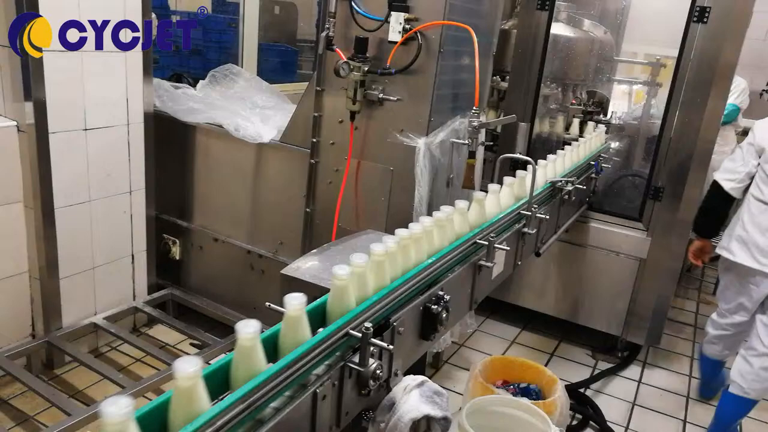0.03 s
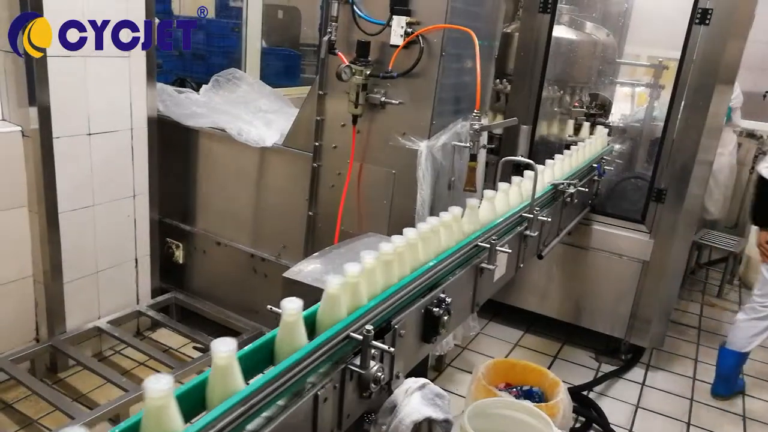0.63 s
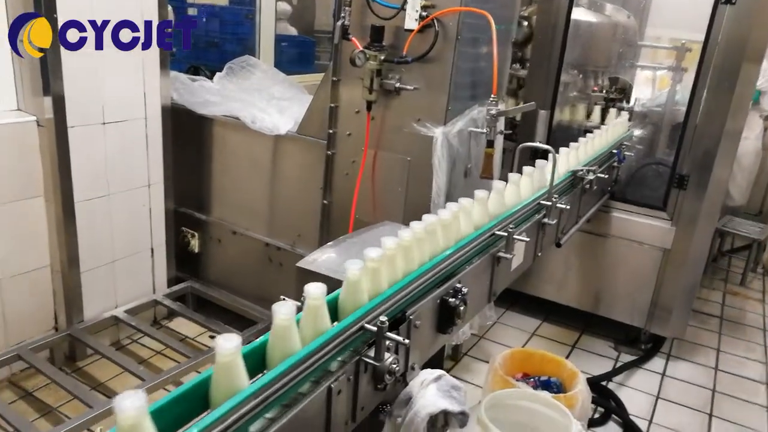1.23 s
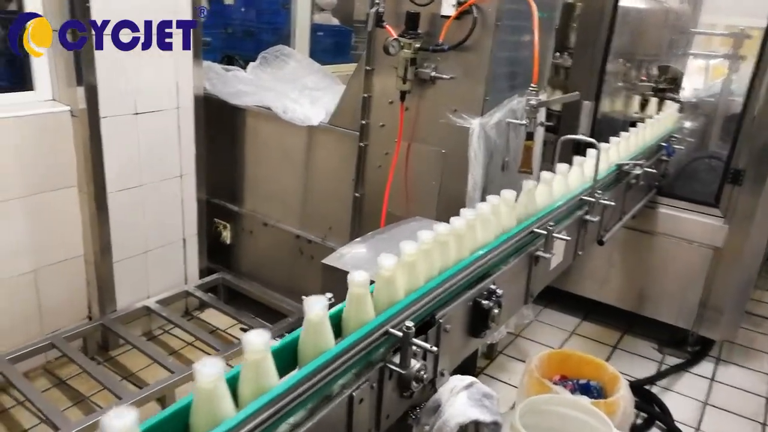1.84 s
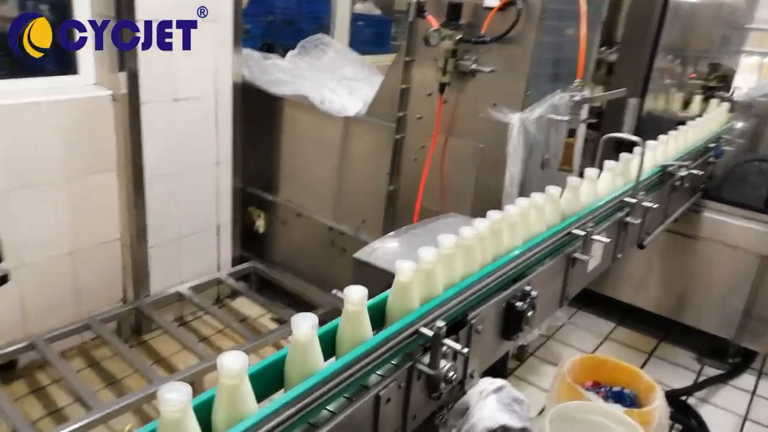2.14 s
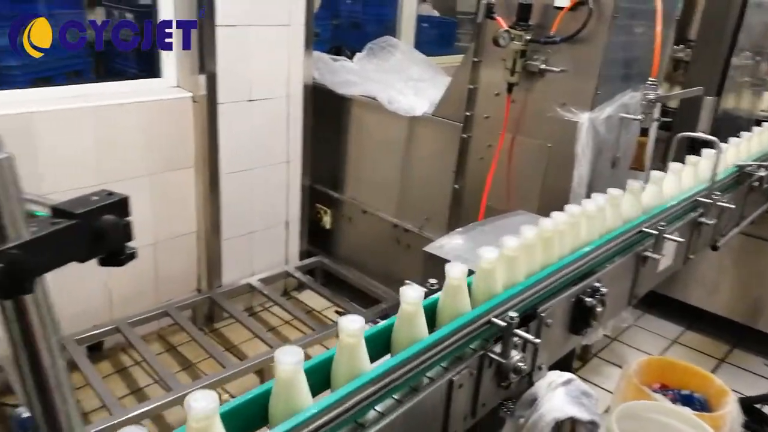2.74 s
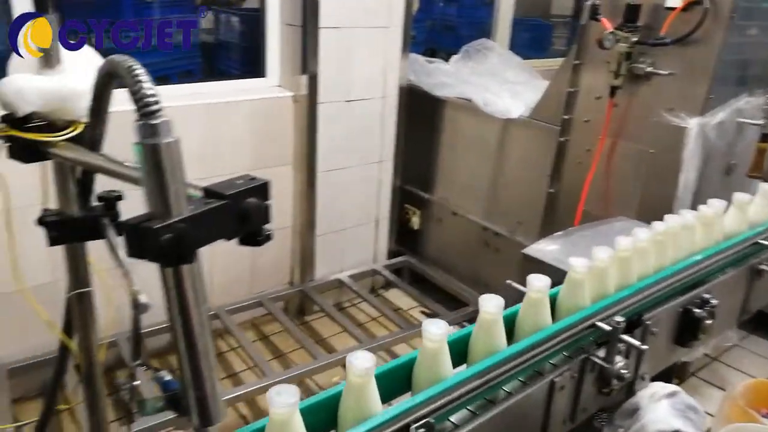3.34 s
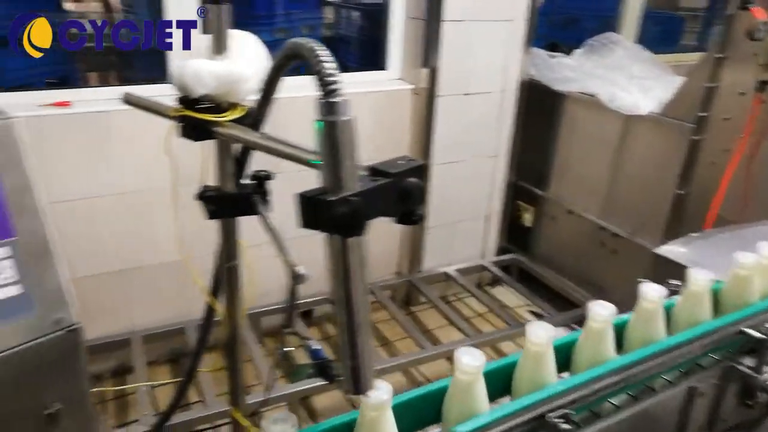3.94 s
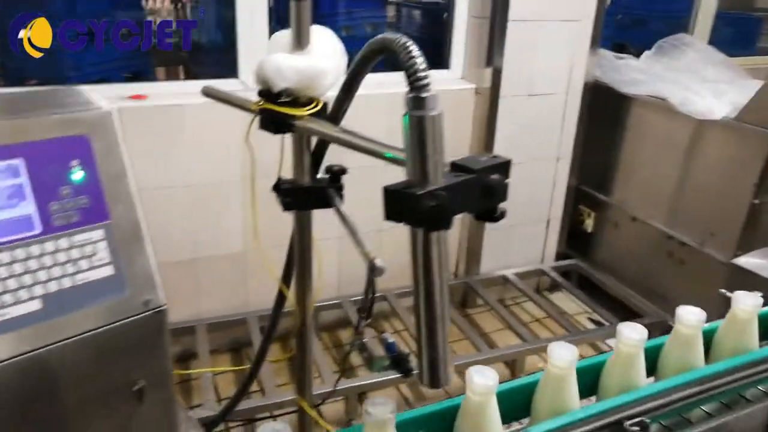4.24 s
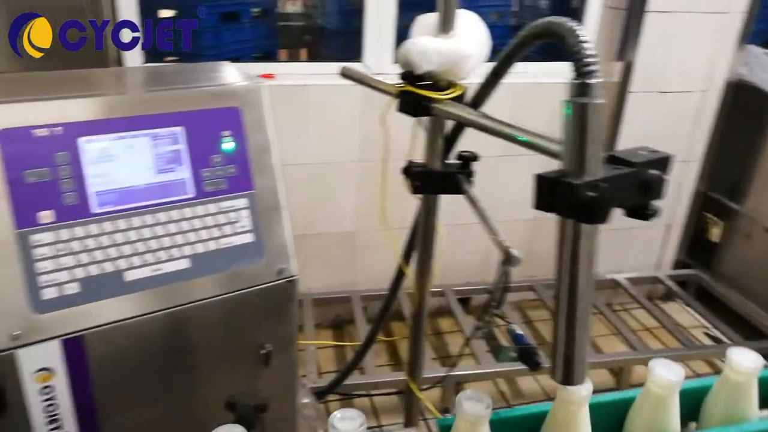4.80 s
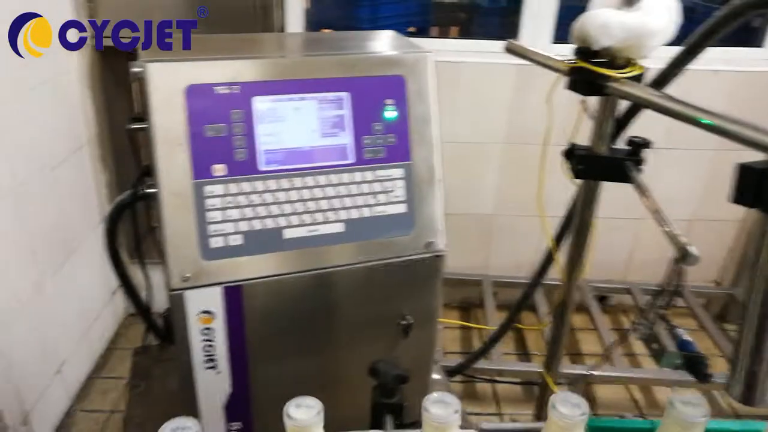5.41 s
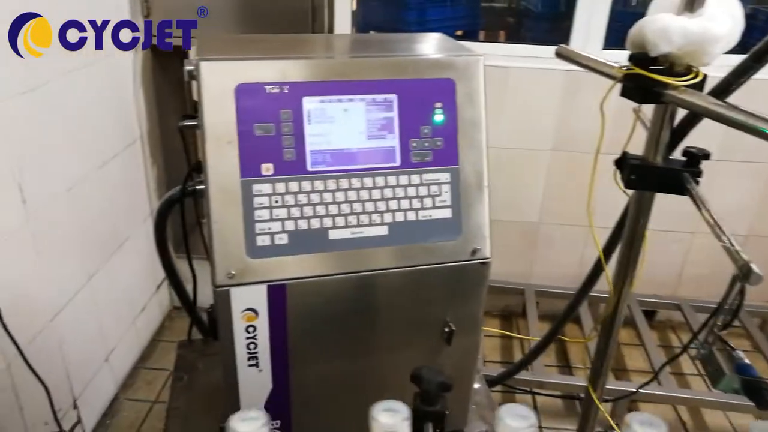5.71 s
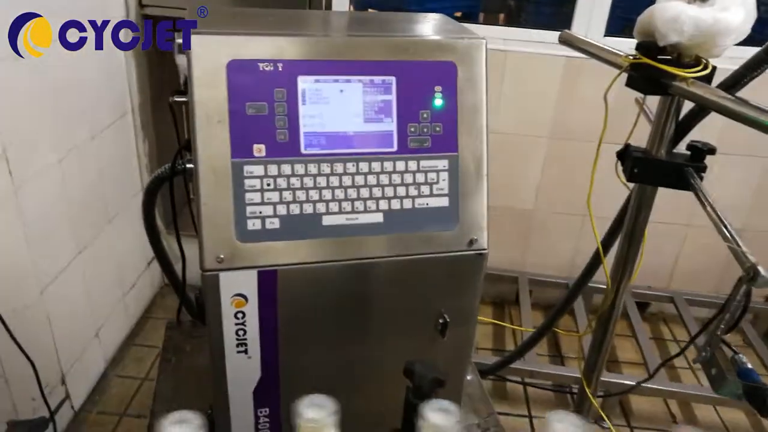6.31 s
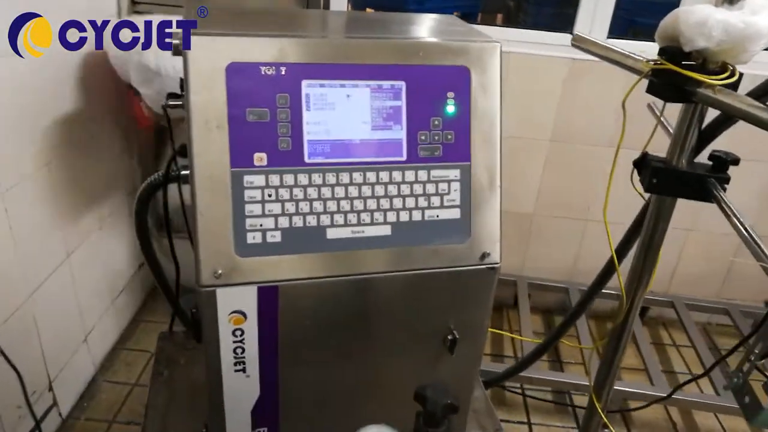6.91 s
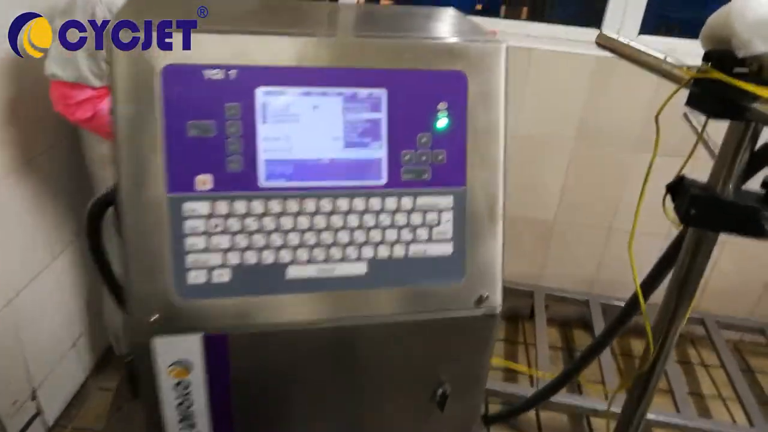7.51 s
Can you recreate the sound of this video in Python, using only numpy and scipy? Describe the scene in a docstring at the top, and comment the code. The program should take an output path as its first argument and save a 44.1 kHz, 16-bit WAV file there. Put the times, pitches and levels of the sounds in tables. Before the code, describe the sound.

After a brief silence, a bottling line starts abruptly at 0.3 seconds and runs throughout in a tiled factory room. Loud, bright compressed air hisses with slight spurts, strongest around 4.9 and 5.7 seconds. Beneath it a filling machine roars unevenly and motors rumble low. Conveyor chain links and bottles scrape and rattle on the left, with sharper bottle knocks near 1.1, 1.9 and 3.1 seconds, each with a short, bright echo. A guide rail squeals faintly around 1.4 seconds. At 3.8 seconds something heavy lands with a dull thud, booms in the room for about a second and rebounds softly at 4.2. As the microphone slowly turns away, the hiss softens slightly, the roar leans further left and the rattle grows a little. The rail gives three brief squeals between 7.2 and 7.5 seconds while the machinery keeps running.

```python
"""A bottling line in a tiled factory room; the listener slowly turns away from the filler.
After 0.3 s of silence: compressed air hisses in spurts, the filler roars, chain links and bottles
rattle and knock, drives rumble below. A guide rail squeals faintly at 1.35 s.
At 3.8 s something heavy thuds, booms in the room and rebounds softly.
From 7.2 s the rail squeals three more times."""
import sys
import numpy as np
from scipy import signal
from scipy.fft import rfft, irfft, next_fast_len
from scipy.io import wavfile
from scipy.ndimage import uniform_filter1d, map_coordinates

SR = 44100
rng = np.random.default_rng(int(sys.argv[2]) if len(sys.argv) > 2 else 0)


def transcribe(u):
    """Save the signal u as a 16-bit wav file named by the first command-line argument.

    u: samples, shape (n,) or (channels, n), limited to [-1, 1]; the rate is SR.
    q: integer samples, one column per channel.
    """
    v = np.clip(np.atleast_2d(u).T, -1, 1)
    q = np.round(v * 32767).astype(np.int16)
    wavfile.write(sys.argv[1], SR, q)


N = 332955
TIME = np.arange(N) / SR
START_S, TOP_HZ = 0.299, 15950

# listener's turn: t/s, heading (0 = facing the filler, 1 = turned away)
HEADING = [(0.3, 0), (2, 0.2), (3.4, .35), (4.2, 1), (5.5, 0.81), (7.55, 0.92)]


def air_jet():
    """Blow-off nozzles hiss; pressure sags after each spurt; level and colour follow the turn."""
    # jet spectra, facing and turned away: f/Hz, relative level/dB
    facing_spectrum = [(100, -90), (1500, -33), (3500, -5), (5300, -5), (7800, -2.5), (10000, -2.5),
                       (11000, -1), (11800, 2.5), (12900, -0.3), (14300, -4.5), (15900, -13)]
    turned_spectrum = [(100, -90), (1500, -32), (3500, -10), (5300, -6.5), (6900, -3), (10000, -3.5),
                       (11500, -0.8), (12700, 1), (13400, 0.2), (14500, -6), (15900, -9.5)]
    # stronger spurts: t/s, rise/dB
    spurts = [(.51, 0.5), (1.0, .8), (2.02, 1.5), (3.42, 1), (4.87, 3.5), (5.65, 2.8), (6.5, 2),
              (6.85, 1.2)]
    # jet direction: t/s, left-right/dB
    aim = [(.3, 1), (1, 1), (3.3, 1.5), (3.6, 2), (4.55, 3), (4.75, 1), (5.15, 0.5), (5.27, 2.5),
           (6.6, 2.3), (7.55, 2)]
    # added balance by frequency: f/Hz, left-right/dB
    balance = [(5000, 0.5), (8000, 0.5), (10000, 1.5), (12000, -3), (13500, -2), (15500, 2)]
    heading = curve(HEADING)
    spurt_db = swells(spurts, half_s=0.062)
    sag_db = 0.4 * swells(spurts, half_s=0.062, delay_s=0.16)
    level_db = -18.5 - 2.5 * heading + spurt_db - sag_db + 0.21 * wobble(10) + 0.47 * wobble(30)
    facing = at_ports(turbulence(patchy_db=1.06), facing_spectrum)
    turned = at_ports(turbulence(patchy_db=1.24), turned_spectrum)
    turn_rad = heading * np.pi / 2
    hiss = np.cos(turn_rad) * facing + np.sin(turn_rad) * turned
    return pan_bands(hiss, balance) * amp(level_db) * pan(curve(aim))


def filler():
    """The filler roars unevenly and leans further left as the listener turns."""
    # roar envelope: t/s, level/dB
    envelope = [(.3, -27), (.55, -24.5), (.95, -24), (1.39, -23.5), (1.7, -24.5), (2.5, -24), (3.6, -25.5),
                (4.5, -26), (4.78, -24.5), (5.02, -26.5), (5.6, -25), (5.75, -27.3), (5.97, -24),
                (6.15, -25.5), (6.46, -23), (6.62, -26), (6.9, -23.5), (7.55, -27)]
    # roar spectrum: f/Hz, relative level/dB
    spectrum = [(60, -65), (250, -45), (450, -13.5), (700, -10.5), (1000, -7), (1350, -4.5), (1700, -1.6),
                (2150, -0.5), (2700, -4.5), (3800, -10), (6000, -37.5), (12000, -49)]
    # added balance by frequency: f/Hz, left-right/dB
    balance = [(400, -3), (750, -5.5), (1100, -2.5), (1600, 1), (2300, 3.5)]
    roar = pan_bands(at_ports(turbulence(patchy_db=1.04), spectrum), balance)
    level_db = curve(envelope) + 0.35 * wobble(24)
    return roar * amp(level_db) * pan(4.1 + 1.4 * curve(HEADING))


def conveyor(count=1600, bottle_hz=2.45, push_peak_s=0.029):
    """Chain links slide and bottles jostle: dense contacts on scraping noise, pushed once per bottle."""
    # rattle and scrape spectrum: f/Hz, relative level/dB
    spectrum = [(200, -70), (800, -39), (1800, -12.5), (2500, -7), (3200, -3), (3900, -2.7), (4600, -1.5),
                (5500, -9.5), (8000, -8.5), (14000, -28)]
    # bottles crowding along the rails: t/s, rise/dB
    jostles = [(.51, 5.5), (1.0, 3.5), (1.7, 4.5), (2.39, 3), (2.76, 4), (3.48, 4.6), (3.61, 4),
               (3.76, 3.5), (4.14, 2), (4.34, 2), (4.6, 2), (4.98, 3.6), (5.12, 2.5), (5.37, 3.5),
               (6.15, 1.5), (6.59, 3), (7.43, 1.8)]
    push_db = 0.44 * np.cos(2 * np.pi * bottle_hz * (TIME - push_peak_s))
    level_db = -28.5 + 3.5 * curve(HEADING) + push_db + swells(jostles, half_s=0.059)
    when, strength = rng.random((count, 2)).T
    contacts = clinks(when * TIME[-1], amp(9 * strength), pitch_hz=2900, spread=0.25)
    rattle = unit(tiled_room(contacts, t60_s=0.44, dry_db=-9.5))
    scrape = unit(turbulence(patchy_db=0.2))
    sound = at_ports(amp(-5.5) * rattle + scrape, spectrum)
    return sound * amp(level_db + 0.14 * wobble(11)) * pan(6.2)


def knocks(soft_count=10, soft_db=-17, highpass_hz=900):
    """Bottles knock together, too small to carry bass; softer knocks fall at random."""
    # hard knocks: t/s, relative level/dB
    hard = [(.54, -13), (1.134, -5), (1.923, -6), (2.595, -11), (3.103, -6), (4.532, -11)]
    soft = [(at_s, soft_db) for at_s in rng.uniform(START_S, TIME[-1], soft_count)]
    times_s, levels_db = np.transpose(list(hard) + soft)
    hits = clinks(times_s, amp(levels_db), pitch_hz=2340, spread=0.306)
    hits = filtered(hits, lambda hz: 1 / (1 + (highpass_hz / (hz + 1)) ** 4))
    return tiled_room(hits, t60_s=0.39, dry_db=-6.5) * pan(2.7)


def thud():
    """A heavy dull blow and its rebound: low modes ring; the room's boom builds, holds and dies."""
    # blow and rebound: t/s, boom level/dB, ring level/dB
    blows = [(3.842, -20, -17.5), (4.24, -34.5, -46)]
    # struck body's modes: f/Hz, relative level/dB, t60/s
    modes = [(62, 5, 0.21), (234, -6, 1), (287, -17, 0.98)]
    # room boom spectrum: f/Hz, relative level/dB
    spectrum = [(20, -13), (45, -6), (95, -11), (135, -5), (230, 1), (320, 0), (400, -3.5), (520, -7),
                (700, -9.5), (1000, -14), (2000, -42), (6000, -90)]
    boom_attack_s, boom_hold_s, boom_t60_s = 0.023, 0.1, 0.86
    ring_delay_s, ring_attack_s = 0.035, 0.018
    out = np.zeros((2, N))
    for at_s, boom_db, ring_db in blows:
        age_s = np.maximum(TIME - at_s, 0)
        decay_db = 60 * np.maximum(age_s - boom_hold_s, 0) / boom_t60_s
        boom = at_ports(rng.standard_normal((2, N)), spectrum) * amp(boom_db - decay_db)
        out += boom * (1 - np.exp(-age_s / boom_attack_s))
        ring_s = np.maximum(age_s - ring_delay_s, 0)
        ring = sum(amp(ring_db + db - 60 * ring_s / t60_s) * np.sin(2 * np.pi * hz * ring_s)
                   for hz, db, t60_s in modes)
        out += ring * (1 - np.exp(-ring_s / ring_attack_s))
    return out


def drives():
    """Motors and gearboxes rumble through the floor, a little unsteadily."""
    # rumble spectrum: f/Hz, relative level/dB
    spectrum = [(20, -27), (40, -16), (62, -7.5), (90, -7), (135, .8), (170, -1.3), (210, -2), (290, .3),
                (360, -.3), (470, -5.3), (700, -12), (1500, -35)]
    level_db = -37.5 - curve(HEADING) + 0.5 * wobble(4.8) + 0.9 * wobble(9)
    return at_ports(turbulence(patchy_db=0), spectrum) * amp(level_db)


def rail_squeals():
    """A guide rail sings briefly with an unsteady pitch."""
    # squeals: centre t/s, half-width/s, f/Hz, level/dB
    squeals = [(1.35, 0.12, 1312, -30), (7.19, 0.02, 1292, -24), (7.32, 0.046, 1310, -31),
               (7.5, 0.046, 1300, -29)]
    out = np.zeros(N)
    for centre_s, half_s, hz, db in squeals:
        swell = np.exp(-((TIME - centre_s) / half_s) ** 2)
        phase_rad = 2 * np.pi * np.cumsum(hz + 14 * wobble(70)) / SR
        out += amp(db + 2.1 * wobble(22)) * swell * np.sin(phase_rad)
    return out * pan(4)


def turbulence(patchy_db):
    """Two unrelated noises whose strength drifts in patches of time and pitch."""
    bins = signal.stft(rng.standard_normal((2, N)), nperseg=512)[2]
    patches = uniform_filter1d(rng.standard_normal(bins.shape[1:]), size=9, axis=0)
    patches = uniform_filter1d(patches, size=12, axis=1)
    return signal.istft(bins * amp(patchy_db * patches / patches.std()), nperseg=512)[1][:, :N]


def clinks(times_s, gains, pitch_hz, spread, t60_s=0.035):
    """Each contact rings three short modes, scattered log-normally about pitch_hz."""
    age_s = TIME[:2048]
    hz = np.minimum(pitch_hz * np.exp(spread * rng.standard_normal((len(times_s), 3))), TOP_HZ)
    tones = np.sin(2 * np.pi * hz[..., None] * age_s).mean(axis=1)
    rings = tones * amp(-60 * age_s / t60_s) * gains[:, None]
    samples = np.round(times_s * SR).astype(int)[:, None] + np.arange(len(age_s))
    return np.bincount(samples.ravel(), rings.ravel(), N)[:N]


def tiled_room(x, t60_s, dry_db):
    """Mono direct sound plus the bright stereo tail of the tiles."""
    tail = rng.standard_normal((2, SR)) * amp(-60 * TIME[:SR] / t60_s)
    wet = signal.fftconvolve(x[None], tail / np.linalg.norm(tail[0]), axes=1)[:, :N]
    return x * amp(dry_db) + wet


def at_ports(pair, spectrum):
    """Colour two signals and blend them at two microphone ports: alike in the bass, apart above."""
    # room field between the ports: f/Hz, coherence (0-1), left lead/rad
    ports = [(30, 1, 0), (90, .995, .02), (170, .97, .08), (300, .83, .3), (380, .47, .5), (450, .17, 1.8),
             (560, .46, 3.45), (950, .35, 4.7), (1400, .22, 6.2), (1900, .3, 7.8), (2800, .22, 10.6),
             (3600, .14, 12.8), (7000, .04, 24)]
    knots_hz, coherence, lead_rad = np.transpose(ports)
    alike = lambda hz: np.interp(hz, knots_hz, coherence)
    shared = filtered(pair[0], lambda hz: alike(hz) * np.exp(-1j * np.interp(hz, knots_hz, lead_rad)))
    own = filtered(pair[1], lambda hz: np.sqrt(1 - alike(hz) ** 2))
    left_right = np.array([pair[0], shared + own])
    return unit(filtered(left_right, lambda hz: amp(along(spectrum, hz))))


def amp(db):
    """Decibels to gain."""
    return 10 ** (np.asarray(db) / 20)


def unit(x):
    """Scale the mean of the channels to rms 1."""
    return x / np.sqrt(np.mean(np.atleast_2d(x).mean(axis=0) ** 2) + 1e-20)


def along(rows, hz):
    """(f/Hz, value) rows read on a log axis."""
    knots_hz, values = np.transpose(rows)
    return np.interp(np.log(hz + 1), np.log(knots_hz + 1), values)


def curve(rows):
    """(t/s, value) rows read at every sample."""
    return np.interp(TIME, *np.transpose(rows))


def swells(rows, half_s, delay_s=0):
    """A Gaussian bump in dB for each (t/s, rise/dB) row."""
    return sum(db * np.exp(-((TIME - at_s - delay_s) / half_s) ** 2) for at_s, db in rows)


def wobble(rate_hz):
    """A smooth random curve, rate_hz knots a second."""
    return map_coordinates(rng.standard_normal(int(N * rate_hz / SR) + 4), [TIME * rate_hz])


def filtered(x, response):
    """Apply a frequency response."""
    size = next_fast_len(N + SR // 2)
    return irfft(rfft(x, size) * response(np.fft.rfftfreq(size, 1 / SR)), size)[..., :N]


def pan(db):
    """Left and right gains for a level difference."""
    return amp(np.array([np.atleast_1d(db), -np.atleast_1d(db)]) / 2)


def pan_bands(x, balance):
    """Pan each frequency by (f/Hz, left-right/dB) rows."""
    return filtered(x, lambda hz: pan(along(balance, hz)))


def scene():
    """The whole line at work; the deepest bass sits near the centre."""
    # balance of rumble and thud: f/Hz, left-right/dB
    low_balance = [(100, -0.5), (200, 0.5), (320, 1), (600, 4)]
    low = pan_bands(drives() + thud(), low_balance)
    return air_jet() + filler() + conveyor() + knocks() + rail_squeals() + low


def record(dry):
    """Abrupt opening at START_S; nothing above TOP_HZ."""
    return filtered(dry * (TIME >= START_S), lambda hz: hz < TOP_HZ)


dry = scene()
out = record(dry)
transcribe(out)
```